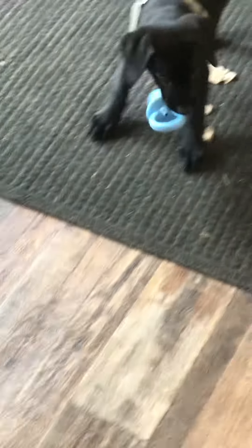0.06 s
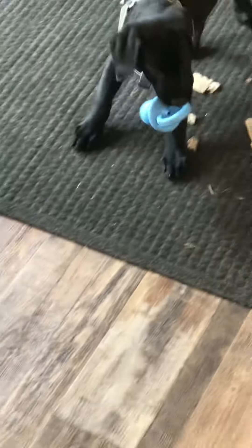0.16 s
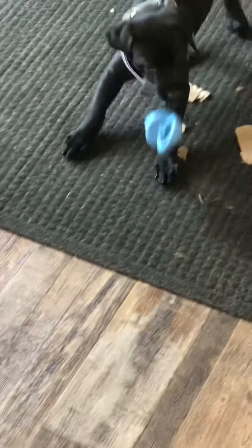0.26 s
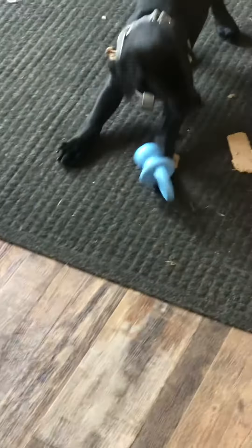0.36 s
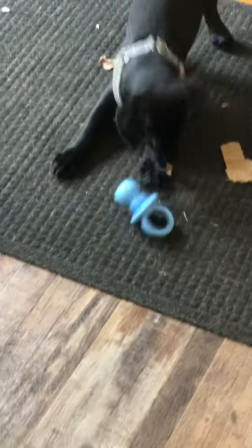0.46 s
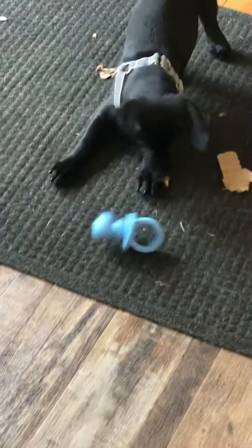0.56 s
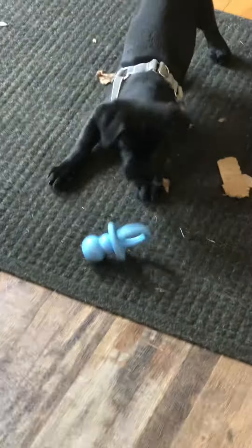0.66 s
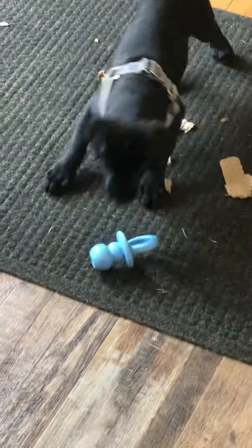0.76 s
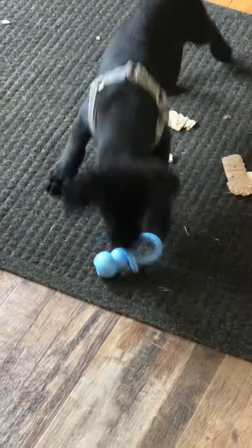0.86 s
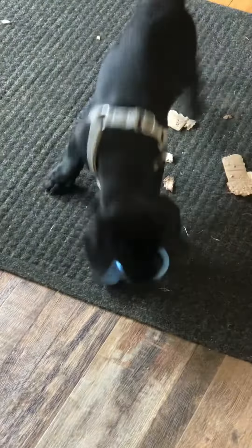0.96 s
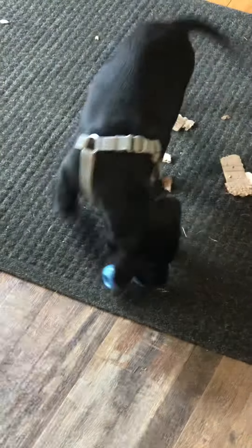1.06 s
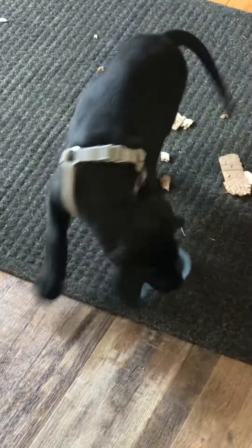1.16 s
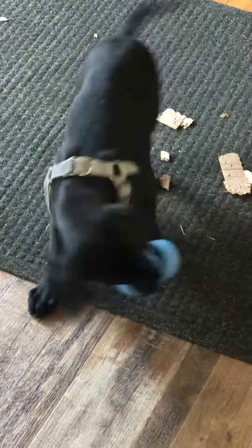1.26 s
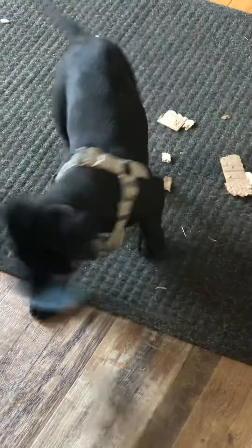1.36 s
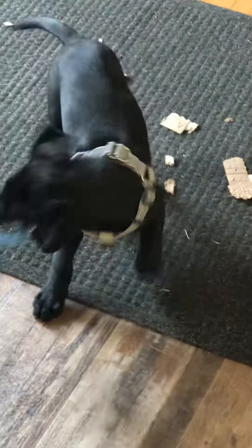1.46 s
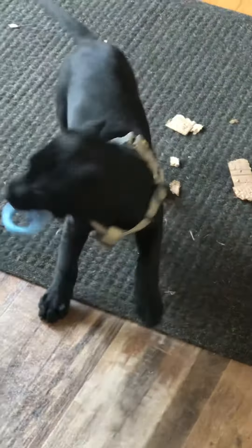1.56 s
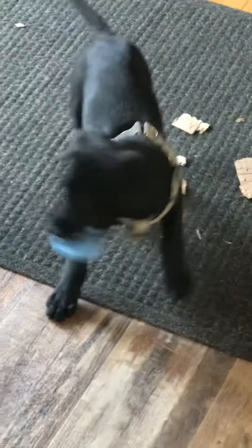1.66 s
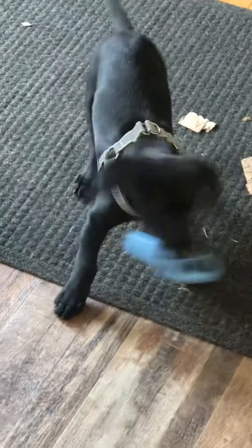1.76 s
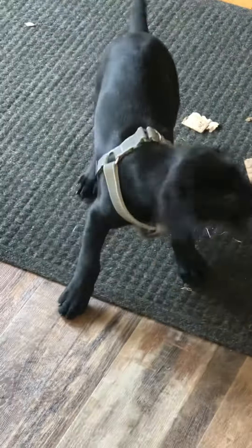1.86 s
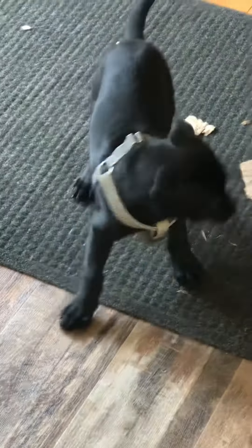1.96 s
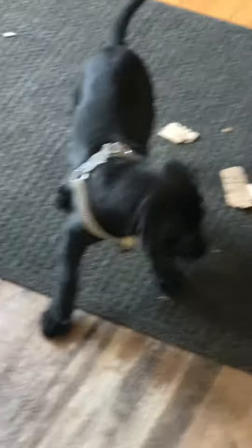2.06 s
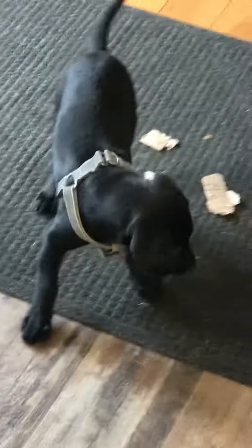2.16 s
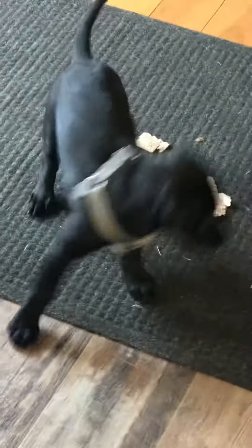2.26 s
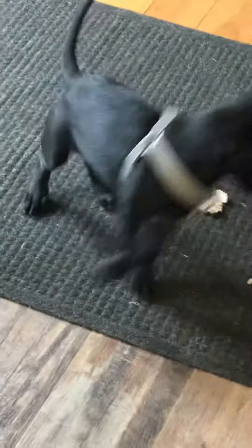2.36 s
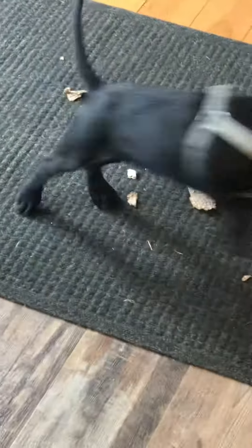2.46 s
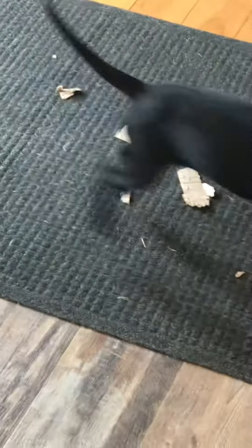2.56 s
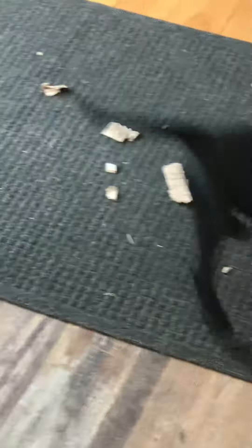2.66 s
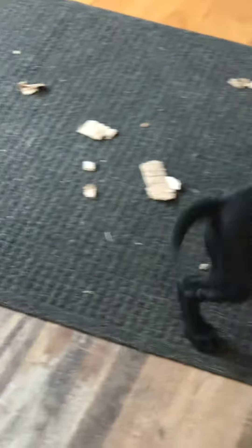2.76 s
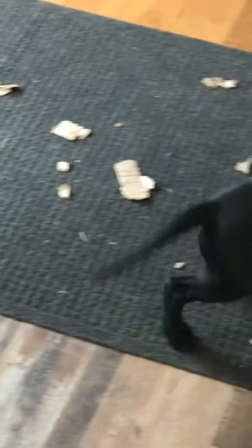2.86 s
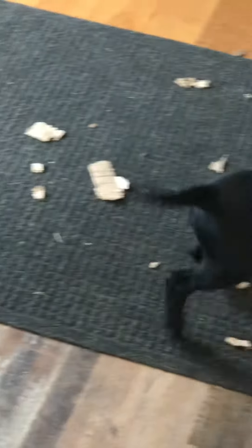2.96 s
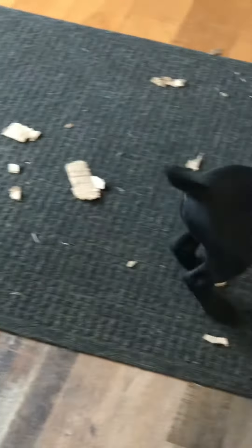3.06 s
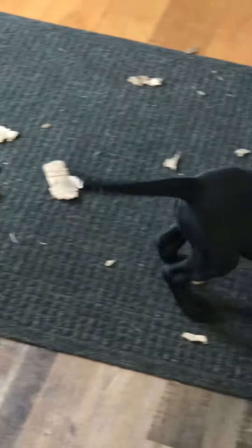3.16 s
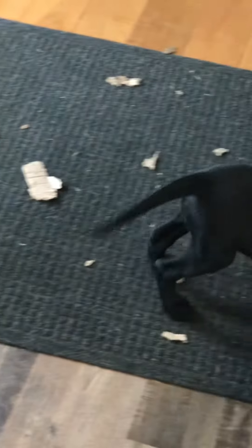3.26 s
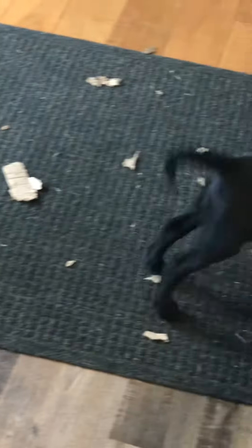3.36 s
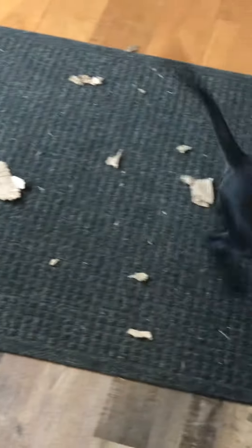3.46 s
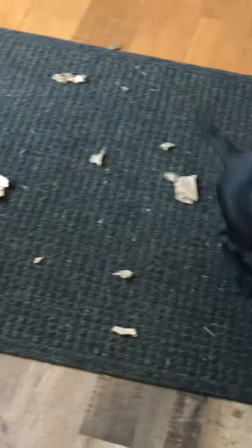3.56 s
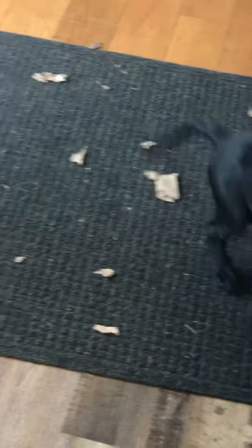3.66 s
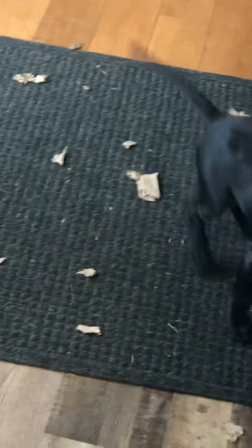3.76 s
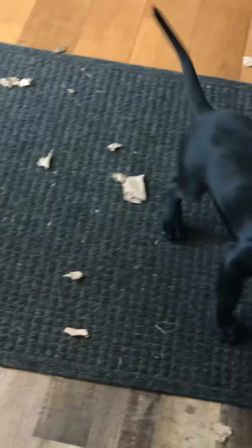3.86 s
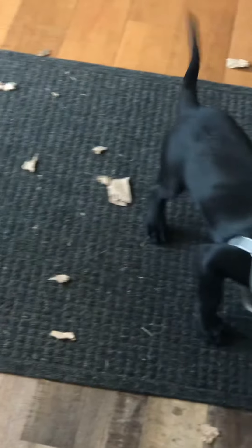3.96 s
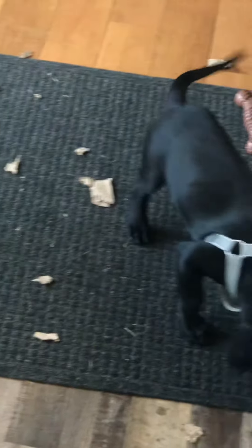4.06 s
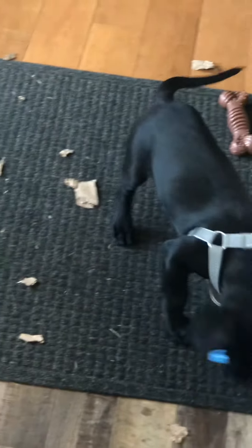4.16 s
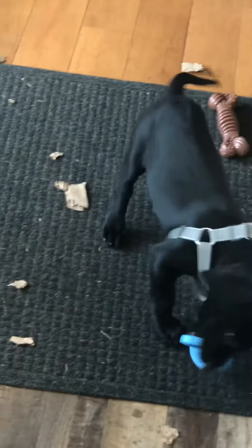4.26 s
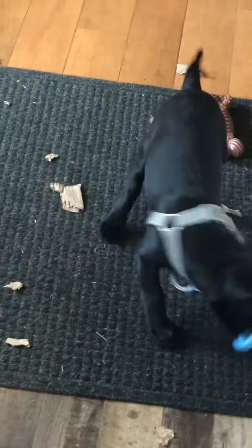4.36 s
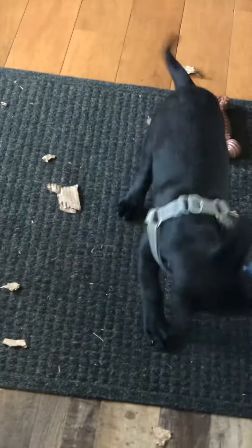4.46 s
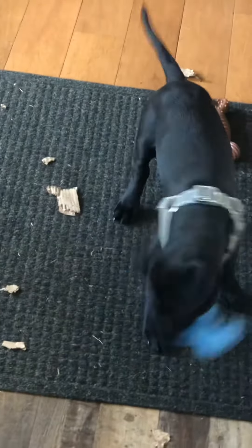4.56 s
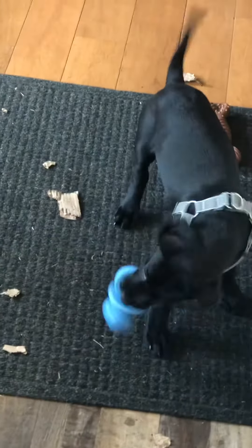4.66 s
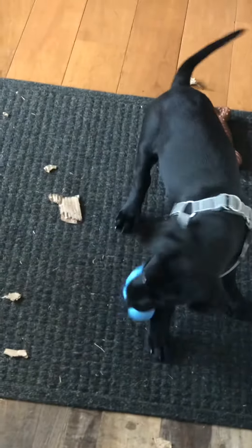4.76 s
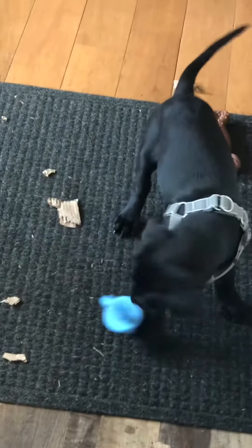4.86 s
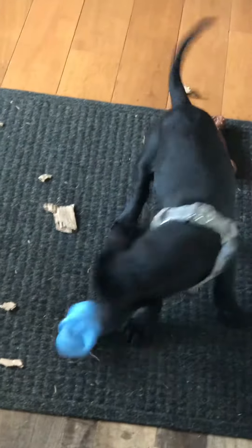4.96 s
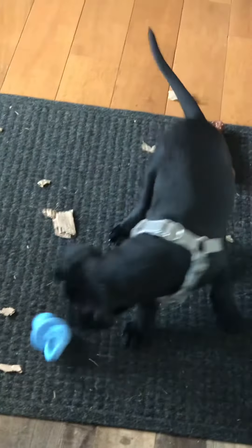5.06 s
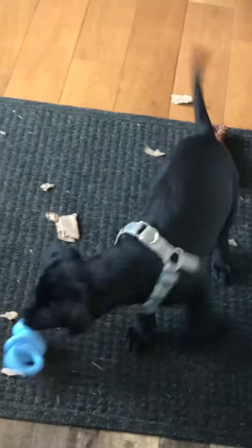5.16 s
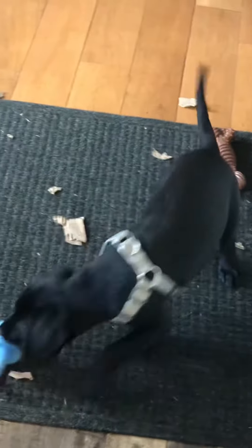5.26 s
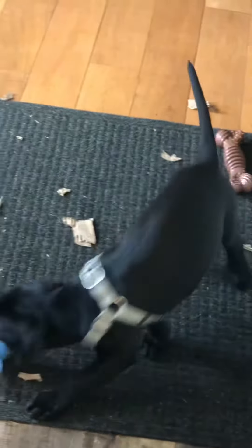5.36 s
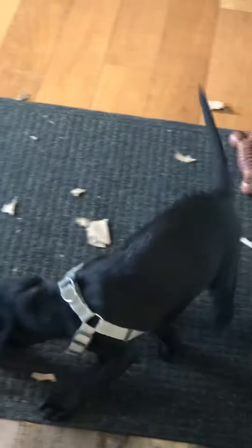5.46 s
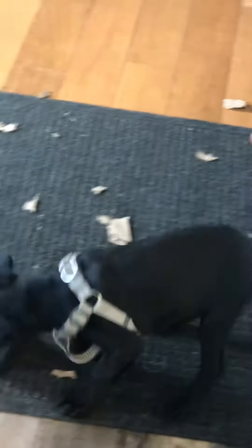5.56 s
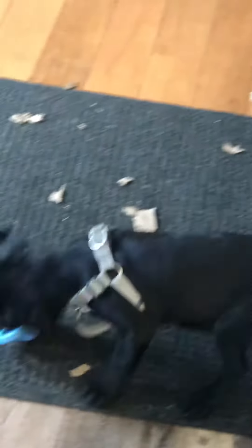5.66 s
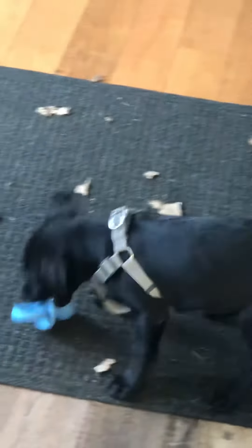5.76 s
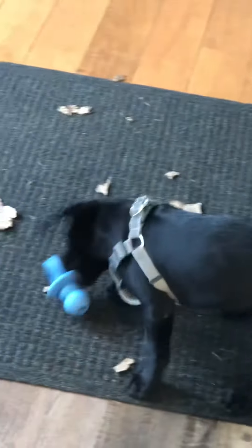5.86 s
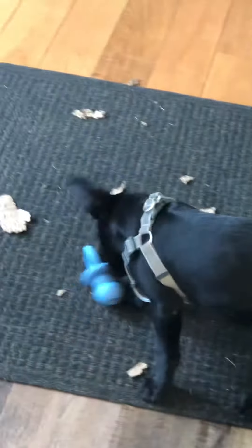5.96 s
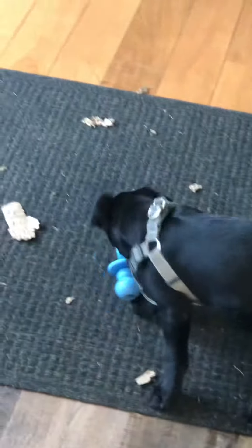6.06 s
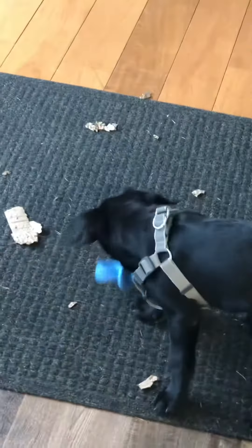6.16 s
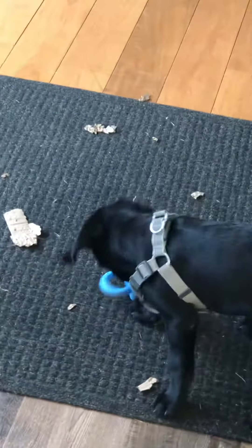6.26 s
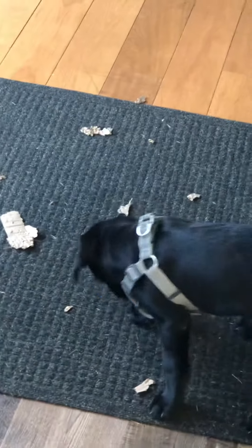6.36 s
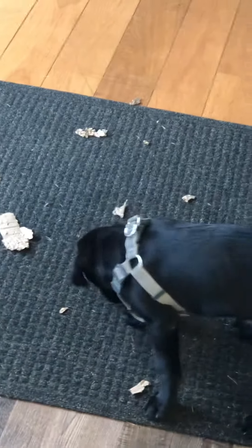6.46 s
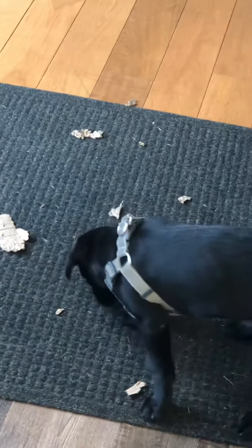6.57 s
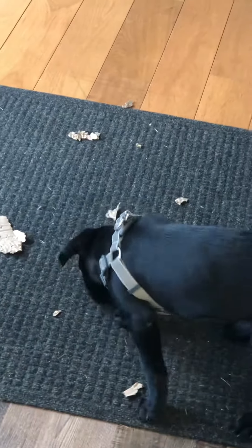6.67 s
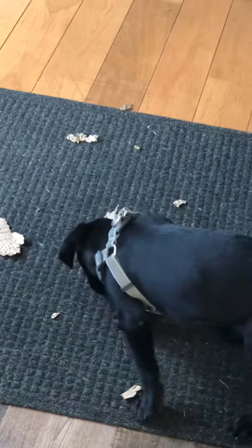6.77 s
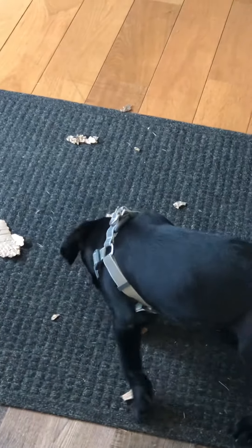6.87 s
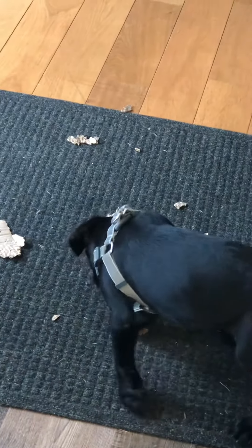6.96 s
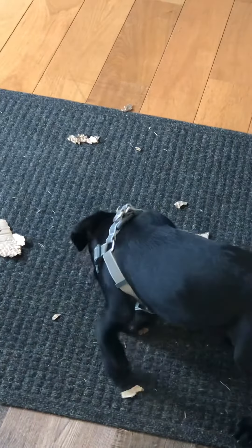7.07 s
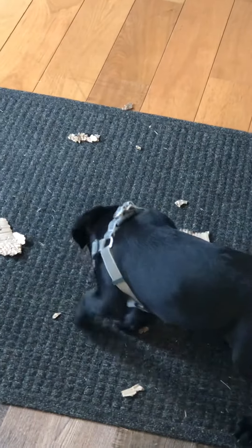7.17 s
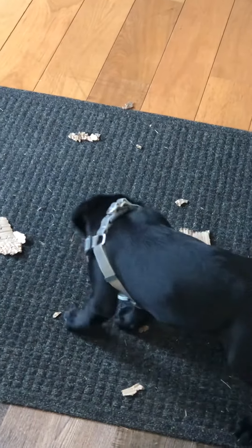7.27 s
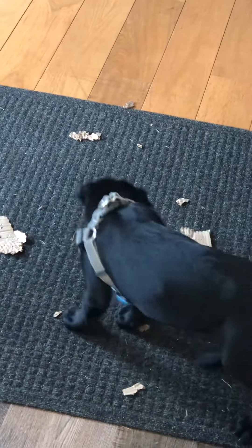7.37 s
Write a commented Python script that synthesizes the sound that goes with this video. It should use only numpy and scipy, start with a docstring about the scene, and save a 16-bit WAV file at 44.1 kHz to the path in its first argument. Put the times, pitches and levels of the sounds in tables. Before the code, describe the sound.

A small indoor room, heard close, with low soft rumble and faint hiss. At about 0.45 s a hollow rubber toy drops with a muted tap and a short mat scuff. Around 0.9 to 1.2 s come crisp claw ticks and brief grainy rubs, then sparse faint clicks. At 2.0 s a loud hard knock lands, followed from 2.25 to 2.75 s by a rapid, uneven clatter of bright clicks, hollow toy knocks and floor thumps, strongest near 2.26 and 2.67 s, with a tiny high harness shimmer. Lighter ticks lead to a scuff at 3.35 s and a deep, dull boom at 3.5 s. From 3.7 to 6.3 s, small taps, teeth clicks, soft thumps and short drags scatter irregularly, with a clearer toy knock near 5.65 s. It grows nearly quiet until a scratchy double click at 7.03 s and last faint knocks.

```python
"""A small room with a ribbed mat on a wooden floor, a phone close by: a puppy tosses and chases a hollow toy.
Claws, teeth and buckles tick and the rubber toy knocks, as short damped partials with a crack and a snap.
Paws and toy thump the floor as decaying modes; drags and scuffs over the mat are grainy noise.
Wall echoes and a noise tail answer from the room, over a low household rumble and a faint hiss."""
import sys
import numpy as np
from scipy import signal
from scipy.fft import rfft, irfft, next_fast_len
from scipy.io import wavfile
from scipy.ndimage import uniform_filter1d

SR = 44100
rng = np.random.default_rng(int(sys.argv[2]) if len(sys.argv) > 2 else 0)


def generate_wav(sig):
    """Save sig (samples, or channels by samples) to the path in sys.argv[1] as 16-bit PCM at SR."""
    pcm = np.round(np.clip(np.atleast_2d(sig).T, -1, 1) * 32767).astype(np.int16)
    wavfile.write(sys.argv[1], SR, pcm)


N = 327663

# Paws and toy land on the boards.
# Each row: start in seconds, peak level in dB, pitch in Hz, share of the deep boards in dB.
LANDINGS = [(0.457, -36, 130, -5), (0.49, -38.5, 130, -3), (0.876, -36.5, 260, -6.5),
            (0.92, -40, 160, -1.5), (1.188, -37.5, 163, -6.5), (1.681, -44, 416, -4),
            (2.014, -27, 516, -3.5), (2.029, -28.5, 174, -6), (2.261, -28.5, 283, -9),
            (2.327, -26, 490, -13), (2.421, -31.5, 290, -7), (2.567, -33.5, 280, -14),
            (2.628, -28.5, 316, -3), (2.657, -20.5, 277, -4), (2.684, -28.5, 240, -1),
            (2.729, -30.5, 266, -6.5), (3.055, -46.5, 179, -9), (3.337, -37.5, 282, -5),
            (3.493, -26, 214, -5.5), (3.835, -43.5, 590, 4), (3.873, -39, 256, 1), (4.34, -42.5, 427, -4),
            (4.519, -41, 260, -3), (4.842, -35, 274, -3), (4.976, -39.5, 236, 0), (5.05, -42.5, 299, -2),
            (5.106, -45.5, 627, 8), (5.329, -44, 150, 3), (5.488, -44.5, 525, 3), (5.529, -41, 291, -4),
            (5.649, -45, 641, -4), (5.908, -44, 218, -2.5), (6.196, -38.5, 430, 0),
            (6.327, -42.5, 300, 4.5), (7.35, -45.5, 200, 4)]


def undb(db):
    """Amplitude factor of a level in dB."""
    return 10 ** (np.asarray(db) / 20)


def unit(x):
    """Scale a sound to an rms of 1."""
    return x / np.sqrt(np.mean(x ** 2))


def decay(t, t60):
    """Exponential fade that has lost 60 dB after t60 seconds."""
    return np.exp(-np.log(1000) * t / t60)


def curve(table):
    """Rows of (seconds, value) joined by straight lines."""
    return np.interp(np.arange(N) / SR, *np.transpose(table))


def band(x, lo_hz, hi_hz):
    """Keep the sound between two frequencies."""
    return signal.sosfilt(signal.butter(2, [lo_hz, hi_hz], "bandpass", fs=SR, output="sos"), x)


def walk(rate):
    """Random levels held 1 / rate seconds and slewed, scaled to an rms of 1."""
    hold = int(SR / rate)
    steps = np.repeat(rng.standard_normal(N // hold + 1), hold)
    return unit(uniform_filter1d(steps, hold)[:N])


def add(out, s, sound):
    """Lay a sound into a track at time s."""
    i = int(s * SR)
    out[..., i:i + sound.shape[-1]] += sound[..., :out.shape[-1] - i]


def stirred():
    """Level of the rumble: steady, with a fading lift after every landing."""
    rumble_db = -58.5
    after_db, after_s = -25, 0.088  # lift relative to the landing's peak, time constant of its power
    t = np.arange(SR) / SR
    power = np.full(N, undb(rumble_db) ** 2)
    for s, db, *_ in LANDINGS:
        add(power, s, undb(db + after_db) ** 2 * np.exp(-t / after_s))
    return np.sqrt(power)


def rumble():
    """Shaped noise whose low bands wander on their own and swell after landings, under a steady hiss."""
    # Colour of the room's background. Each row: frequency in Hz, relative density in dB per Hz.
    colour = [(15, -52), (25, -14), (59, -2.5), (137, -3.5), (170, -2), (285, -10), (394, -14), (427, -19),
              (463, -12.5), (659, -14), (863, -23), (1330, -28.5), (1890, -35), (16000, -62.5)]
    hiss_db = -80
    hz_points, db_points = np.transpose(colour)
    size = next_fast_len(N)
    hz = np.linspace(1, SR / 2, size // 2 + 1)
    spectrum = rfft(rng.standard_normal(size))
    spectrum = spectrum * undb(np.interp(np.log(hz), np.log(hz_points), db_points))
    edges = [0, 80, 140, 240, 420, 750, 1400, SR]  # Hz; the last band is the hiss
    *lows, hiss = (irfft(spectrum * ((hz >= lo) & (hz < hi)), size)[:N] for lo, hi in zip(edges, edges[1:]))
    bass = sum(part * undb(1.8 * walk(7)) for part in lows)
    return unit(bass) * stirred() + unit(hiss) * undb(hiss_db)


def room(send):
    """A few wall echoes and a diffuse noise tail that dies faster in the treble."""
    # Decay of the room by band. Each row: band centre in Hz, 60 dB decay time in seconds.
    decay_bands = [(400, 0.74), (1500, 0.49), (4000, 0.43), (6500, 0.32), (11000, 0.08)]
    # First returns from the walls. Each row: delay in milliseconds, level in dB.
    wall_echoes = [(7.8, -11.5), (15.2, -15), (31, -24), (47, -21)]
    tail_db = 0  # total energy of the tail
    t = np.arange(SR // 2) / SR
    tail = np.zeros(len(t))
    for hz, t60 in decay_bands:
        noise = band(rng.standard_normal(len(t)), hz / 2.11, min(hz * 2.17, SR * .45))
        tail += noise * decay(t, t60)
    tail = tail * (1 - np.exp(-t / 0.0022))
    tail = undb(tail_db) * tail / np.sqrt(np.sum(tail ** 2))
    for ms, db in wall_echoes:
        tail[int(ms * SR / 1000)] += undb(db)
    return signal.fftconvolve(send, tail)[:N]


def scuff():
    """Fine grains from fur and the ribs of the mat, in a middle and a steady top band."""
    # Faint rustle of fur and mat. Each row: time in seconds, level of the middle band in dB.
    rustle_levels = [(0.0, -69), (0.16, -76), (0.91, -75), (1.06, -71.5), (2.0, -75.5), (2.63, -67),
                     (3.17, -76.5), (3.58, -72), (3.95, -76), (4.41, -69), (4.65, -77.5), (5.67, -72.5),
                     (5.98, -78), (6.93, -79.5), (7.1, -75), (7.43, -78.5)]
    top_db = -79.5
    mid = unit(undb(1.23 * walk(150)) * band(rng.standard_normal(N), 1400, 6450))
    top = unit(undb(.8 * walk(150)) * band(rng.standard_normal(N), 8500, 22000))
    return undb(curve(rustle_levels)) * mid + undb(top_db) * top


def tones(events, rise_cycles):
    """Single modes that swell with a time constant of rise_cycles and die away."""
    out, t = np.zeros(N), np.arange(SR // 2) / SR
    for s, db, hz, t60 in events:
        fade = decay(t, t60) * (1 - np.exp(-t * hz / rise_cycles))
        add(out, s, undb(db) * fade * np.sin(2 * np.pi * hz * t))
    return out


def jingle():
    """A harness ring is flicked and two of its modes, close in pitch, beat."""
    # Modes of the ring. Each row: start in seconds, level in dB, frequency in Hz, 60 dB decay time in seconds.
    ring_modes = [(2.685, -66, 15050, .2), (2.685, -68, 15200, .2)]
    return tones(ring_modes, rise_cycles=3)


def booms():
    """The toy drops with the puppy's weight behind it and the joists boom, each on one low mode."""
    # Heavy drops. Each row: start in seconds, level in dB, frequency in Hz, 60 dB decay time in seconds.
    drops = [(2.03, -54, 59, .5), (2.67, -50, 62, .5), (3.50, -38, 59, 0.68)]
    return tones(drops, rise_cycles=.8)


def drags():
    """A paw, fur or the toy drags over the mat's ribs: noise around a pitch swells and fades in uneven grains."""
    # Each row: start in seconds, length in seconds, level in dB before swell and grain, pitch in Hz,
    # breadth in octaves to each side, top band in dB relative to the middle.
    strokes = [(.0, 0.17, -75, 3950, 1.1, -16), (0.388, 0.053, -75, 3000, 1.1, -12),
               (0.436, 0.052, -58.5, 1480, 0.8, -24), (.95, .06, -65, 6260, 0.24, -20),
               (1.0, 0.088, -67, 4000, 0.15, -18), (1.67, 0.037, -71.5, 4000, 1.3, -8),
               (1.769, .05, -71, 3380, .15, -20), (3.39, .1, -64, 4380, .12, -20),
               (1.088, 0.079, -68.5, 3000, 1.4, -13), (2.011, 0.065, -51.5, 1500, 0.87, -30),
               (3.34, .22, -61.5, 3920, 1.15, -12), (3.819, 0.098, -66, 2000, 1.1, -17),
               (4.309, 0.16, -68, 4500, 1.2, -9), (4.581, 0.12, -73, 4000, 1.4, -8),
               (5.221, 0.025, -67, 3980, 1.5, -14), (5.471, 0.039, -72, 4000, 1, -12),
               (5.526, 0.06, -69.5, 4500, 0.8, -11), (5.586, .04, -61.5, 5000, 1.1, -7),
               (6.199, .07, -62.5, 700, 0.83, -30), (6.32, 0.048, -65, 700, .9, -30),
               (6.925, 0.12, -73.5, 5500, 0.85, -6), (7.028, 0.026, -58.5, 5000, 0.6, -2),
               (7.054, 0.15, -75.5, 4480, 1.1, -13)]
    out, grain = np.zeros(N), undb(2.95 * walk(300) + 1.4 * walk(40))
    for s, length, db, hz, breadth, top_db in strokes:
        count = int(length * SR)
        mid = band(rng.standard_normal(count), hz / 2 ** breadth, min(hz * 2 ** breadth, 12000))
        top = band(rng.standard_normal(count), 8000, 22000)
        swell = np.sin(np.pi * np.arange(count) / count) ** .7
        swell = swell * grain[int(s * SR):][:count]
        add(out, s, undb(db) * swell * (unit(mid) + undb(top_db) * unit(top)))
    return out


def thumps():
    """A soft landing sets off the floor modes near its own pitch; weight also reaches the deep boards and joists."""
    # Floor and room modes, varied a little at each landing.
    # Each row: frequency in Hz, relative level in dB, 60 dB decay time in seconds.
    floor_modes = [(59, -9, .6), (91.7, 3.5, 0.49), (110.1, 2.5, 0.43), (167, 0, 0.33), (199.4, -2.5, 0.28),
                   (224.8, -1, 0.23), (246, 0.5, 0.23), (266, 1, 0.25), (292.8, -0.5, 0.26),
                   (329.3, -1.5, 0.18), (370.8, -0.5, 0.22), (420, -2, .18), (469.7, -0.5, .16),
                   (536.3, 2.5, .2), (603.3, 3, .22), (689, 2, 0.17), (790, 1, .15), (897, 0, .13),
                   (1020, -0.5, 0.14)]
    deep_hz, joist_hz, joist_db = 130, 70, -12  # the deep boards and, lower still, the joists
    reach_octaves = 0.79  # a mode this far from the landing's pitch gets 7 dB less
    rise_s = 0.0038
    out, t = np.zeros(N), np.arange(SR // 3) / SR
    hz, mode_db, t60 = (c[:, None] for c in np.transpose(floor_modes))
    for s, db, pitch_hz, deep_db in LANDINGS:
        place_db, detune, phase = rng.standard_normal((3, len(floor_modes), 1))
        near_db = -7 * np.abs(np.log2(hz / pitch_hz) / reach_octaves) ** 1.25
        share_db = np.where(hz < joist_hz, joist_db, np.where(hz < deep_hz, deep_db, near_db))
        # a quick first drop as the landing body damps the boards, then the slower ring
        fade = decay(t, t60) * (1 + 1.8 * np.exp(-t / 0.009))
        rise = (1 - np.exp(-t * hz * 1.87)) * (1 - np.exp(-t / rise_s))
        modes = np.sin(2 * np.pi * hz * (1 + 0.0257 * detune) * t + 1.52 * phase)
        ring = np.sum(undb(mode_db + share_db + 1.4 * place_db) * fade * rise * modes, axis=0)
        add(out, s, undb(db) * ring / np.abs(ring).max())
    return out


def rings(events, cycles, send_db, spread, second):
    """Each blow swells and rings two quickly damped partials behind a broad crack and a thin snap.
    Returns rows: direct sound, ring sent to the room, crack sent to the room."""
    ring_top_hz = 8000  # the rings carry little above this
    out, t = np.zeros((3, N)), np.arange(1024) / SR
    crack = band(band(1. * (t == 0), 2250, 7000), 1200, 7000)
    crack = crack / np.abs(crack).max()
    snaps = band(rng.standard_normal((len(events), len(t))), 9100, 18000) * np.exp(-t / .001)
    # floor and fur close by scatter the direct sound over the next few milliseconds
    early = t[:256]
    scatters = 0.078 * rng.standard_normal((len(events), 256)) * np.exp(-early / 0.0016)
    scatters = scatters + 0.72 * (early == 0)
    for (s, db, hz, crack_db, snap_db), snap, scatter in zip(events, snaps, scatters):
        age = 5 * t * hz / cycles  # reaches 5 after the given cycles, when the ring has mostly died
        pair = np.sin(2 * np.pi * hz * t) + second * np.sin(2 * np.pi * hz * spread * t)
        ring = band(age * np.exp(-age) * pair, 500, ring_top_hz)
        ring = ring / np.abs(ring).max()
        blow = undb(crack_db) * crack
        near = np.convolve(ring + blow, scatter)[:len(t)]
        near = near / np.abs(near).max() + undb(snap_db) * snap
        levels = undb([[db], [db + send_db], [db + send_db]])
        add(out, s, levels * np.array([near, ring, blow]))
    return out


def faint_ticks():
    """Tick rows at random moments, with levels and pitches scattered about a middle value."""
    count = 12
    middle_db, scatter_db, middle_hz, scatter_octaves = -59.5, 1, 4500, .4
    crack_db, snap_db = -9, -20
    when = rng.random(count) * N / SR
    size, pitch = rng.standard_normal((2, count))
    return [(s, middle_db + scatter_db * a, middle_hz * 2 ** (scatter_octaves * b), crack_db, snap_db)
            for s, a, b in zip(when, size, pitch)]


def ticks():
    """Claws, teeth and buckles tick: very short rings with a wide second partial."""
    # Each row: start in seconds, peak in dB before the snap, pitch in Hz, crack in dB and snap in dB
    # relative to the ring and to that peak.
    tick_rows = [(0.4504, -47, 2580, -15, -32), (0.4714, -53, 2920, -5, -24),
                 (0.8776, -44.5, 2570, -7, -26), (0.9045, -38.5, 6700, -4, -33),
                 (0.9538, -29.5, 6040, -20, -32), (0.9664, -40, 6410, -14, -33),
                 (1.036, -48, 4100, -13, -21), (1.1133, -49, 3080, -10, -16), (1.1877, -52, 3770, -14, -21),
                 (1.5555, -43, 7040, -15, -10), (1.682, -49, 2840, -12, -17), (1.7709, -55, 3420, -8, -18),
                 (1.8372, -45, 8400, -10, -20), (2.0098, -22.5, 3900, -2.5, -36),
                 (2.027, -33, 2200, -6, -40), (2.042, -42, 3300, -9, -40), (2.240, -40, 3830, 5, -3),
                 (2.2598, -19.5, 4720, 0, -25), (2.4235, -29, 2540, -1, -38), (2.5659, -26, 3130, -6, -43),
                 (2.6279, -48, 2570, 5, -21), (2.6563, -25.5, 2700, -1.5, -28),
                 (2.684, -19, 5850, -14, -18), (2.7267, -26.5, 4030, -20, -32), (2.951, -52, 5380, -5, -23),
                 (3.0844, -51, 3980, -1, -24), (3.1004, -49, 4030, -7, -24), (3.1732, -39.5, 4270, -8, -20),
                 (3.316, -48, 4200, 2, -11), (3.3352, -31, 3360, -15, -21), (3.488, -41, 3000, -9, -24),
                 (3.6482, -51, 9500, -22, 3), (3.7088, -35, 5640, -9, -11), (3.8492, -45, 2600, -15, -26),
                 (3.9044, -43.5, 4180, -9, -21), (4.142, -41.5, 6430, -3, -20),
                 (4.1619, -53, 6770, -8, -25), (4.3442, -45, 3190, -13, -19), (4.5201, -42, 4100, -10, -21),
                 (4.5822, -37, 3700, 1, -22), (4.6462, -44, 5160, -9, -24), (4.8432, -38, 3200, -6, -38),
                 (4.8714, -49, 5000, -9, -29), (4.9667, -45.5, 2760, -5, -28), (5.045, -40, 2860, -21, -38),
                 (5.2011, -47.5, 6400, -11, -19), (5.228, -44.5, 2560, -10, -25),
                 (5.5284, -34.5, 5450, -9, -32), (5.563, -42.5, 3900, -11, -14),
                 (5.6064, -38, 3540, -13, -19), (5.7548, -49, 2920, -12, -23), (5.9025, -49, 2520, -9, -22),
                 (7.0349, -38.5, 4900, -8, -10), (7.0436, -39, 7850, -9, -19),
                 (7.2372, -55, 3260, -17, -13)]
    return rings(tick_rows + faint_ticks(), cycles=3.17, send_db=-7.5, spread=1.344, second=0.38)


def knocks():
    """The hollow toy is knocked or bitten: its cavity rings longer, and a squeeze shifts its pitch."""
    # Each row: start in seconds, peak in dB before the snap, cavity pitch in Hz.
    toy_blows = [(0.436, -48.5, 1180), (0.601, -56, 1320), (0.934, -52.5, 1220), (1.1174, -51, 1360),
                 (1.1887, -51.5, 1180), (1.486, -54.5, 1020), (1.7599, -57, 1320), (1.779, -51.5, 1360),
                 (2.0098, -26, 1620), (2.26, -21, 1560), (2.4239, -24.5, 1650), (2.5661, -40, 1220),
                 (2.6285, -38, 1880), (2.6567, -35.5, 1190), (2.728, -33, 1410), (3.3256, -53, 1290),
                 (3.3352, -43.5, 1360), (3.8397, -39, 1290), (3.8698, -44.5, 1920), (4.339, -40.5, 1180),
                 (4.5206, -52, 1420), (4.5822, -47, 1320), (4.8441, -41, 1450), (4.856, -43, 2100),
                 (5.0462, -44.5, 1410), (5.5283, -49.5, 1500), (5.6373, -41.5, 1270), (5.6475, -32, 1300),
                 (5.7576, -41.5, 1230), (5.7775, -48, 1400), (5.903, -53.5, 1120), (6.197, -51, 1390),
                 (7.2284, -50.5, 1290), (7.384, -50, 1320)]
    crack_db, snap_db = -15, -40
    events = [(*row, crack_db, snap_db) for row in toy_blows]
    return rings(events, cycles=5.5, send_db=-5, spread=1.174, second=.15)


def scene():
    """The puppy and toy heard directly and by way of the room, over the background."""
    direct, ring, crack = ticks() + knocks()
    rub, thud = drags(), thumps()
    # ring and crack each get their own random room tail, so the two do not cancel
    walls = room(ring + 0.28 * rub) + room(crack + .28 * thud)
    floor = thud + booms()
    background = scuff() + rumble()
    return (direct + rub + walls + floor + jingle() + background)[None]


def record(dry):
    """Drop the deepest bass and leave next to nothing above 16 kHz."""
    low_hz, top_hz = 41, 16000
    dry = signal.sosfilt(signal.butter(4, low_hz, "highpass", fs=SR, output="sos"), dry)
    return signal.sosfilt(signal.ellip(10, .2, 60, top_hz, fs=SR, output="sos"), dry)


dry = scene()
out = record(dry)
generate_wav(out)
```